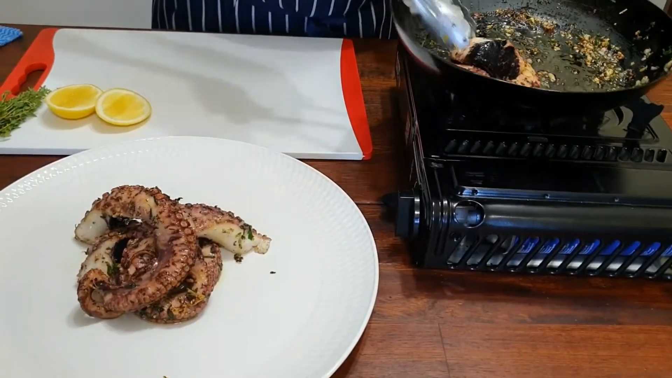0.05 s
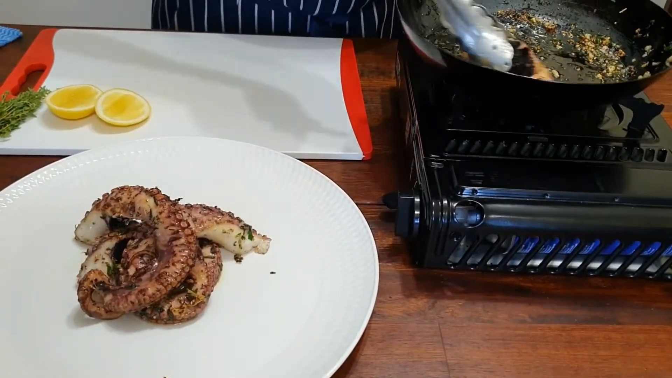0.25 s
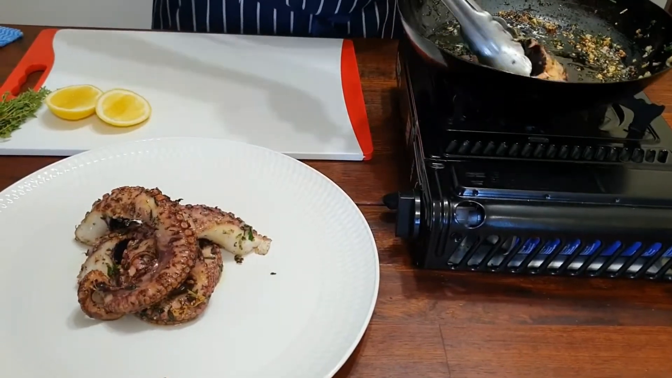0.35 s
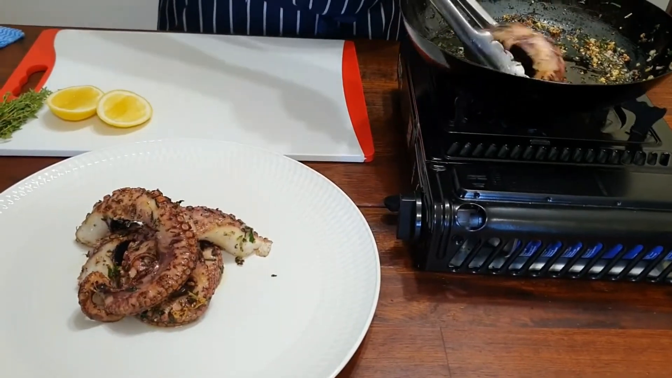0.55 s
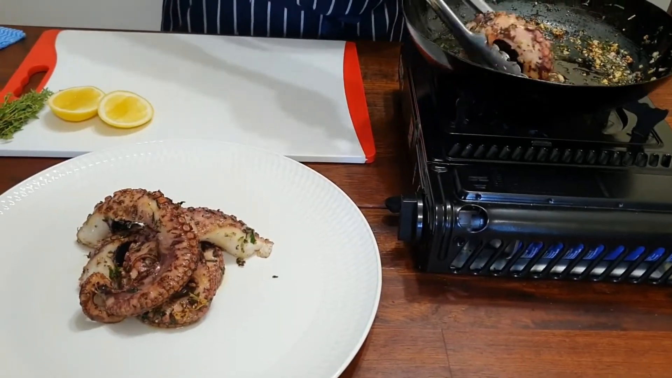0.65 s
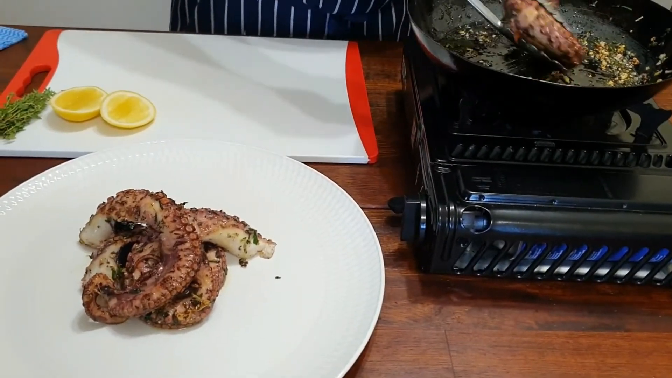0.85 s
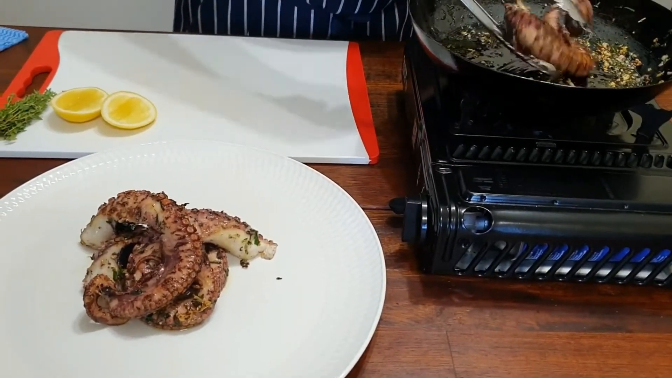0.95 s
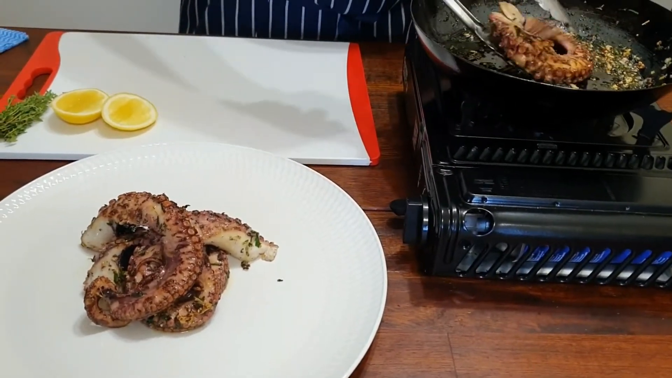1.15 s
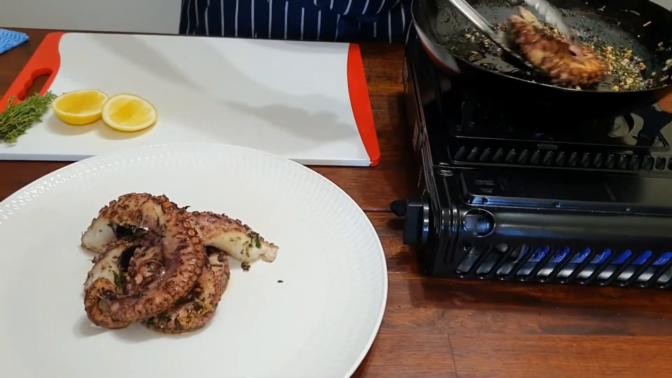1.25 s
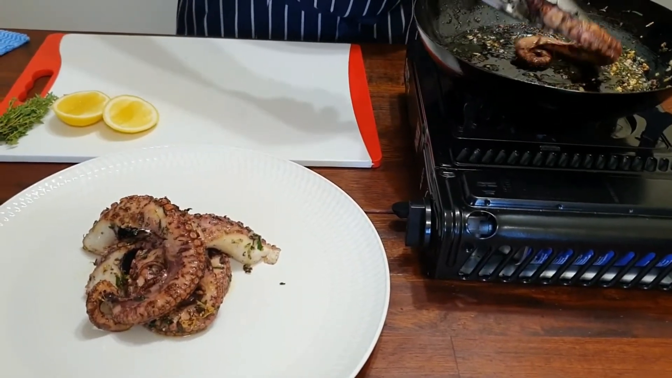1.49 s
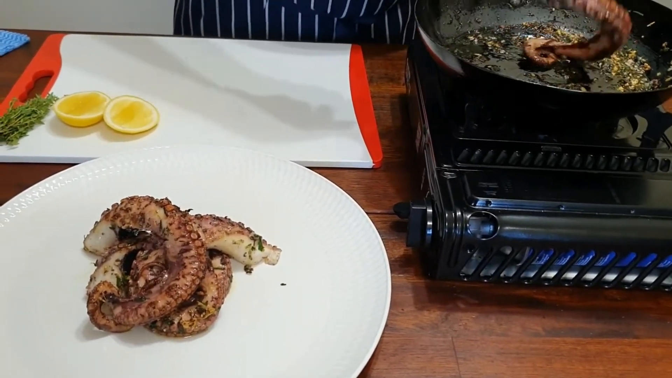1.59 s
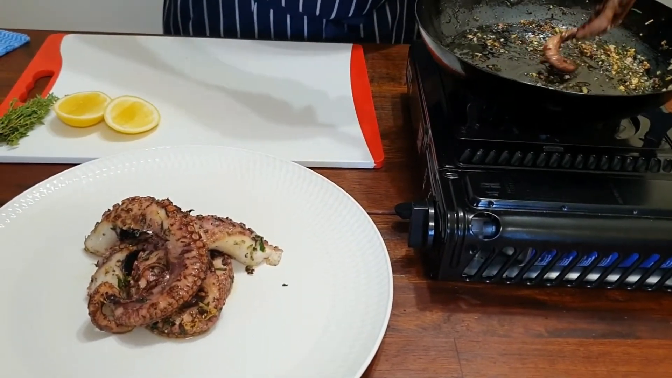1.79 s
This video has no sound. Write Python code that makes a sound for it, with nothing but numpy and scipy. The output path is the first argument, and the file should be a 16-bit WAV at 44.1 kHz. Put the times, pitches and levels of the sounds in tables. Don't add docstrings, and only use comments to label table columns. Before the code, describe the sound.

Metal tongs on a frying pan, heard close in stereo in a hard-walled kitchen. A light drag leads to a loud clank at 0.22 s, then the pan knocks its grate at 0.25 s, rebounding, briefly ringing and rocking. Scraping with small ticks runs to 0.6 s, a lighter clink lands at 0.61 s, rim taps at 1.07 s, and a faint scrape with nudges at 1.32-1.47 s, over low rumble and faint hiss.

```python
import sys
import numpy as np
from scipy import signal
from scipy.fft import rfft, irfft
from scipy.io import wavfile
from scipy.ndimage import uniform_filter1d

SR = 44100
rng = np.random.default_rng(int(sys.argv[2]) if len(sys.argv) > 2 else 0)


def pcm_store(signal):
    levels = np.round(np.clip(np.atleast_2d(signal), -1, 1) * 32767)
    wavfile.write(sys.argv[1], SR, levels.astype(np.int16).T)


def gain_from_decibels(decibels):
    exponent = np.asarray(decibels, float) / 20
    return 10 ** exponent


N = 79380

# frequency [Hz], level [dB].
RIM_CRACK = [(200, -20), (683, -3), (1710, -3), (2700, -16), (3300, -3), (4200, -15), (8000, -14),
             (10500, -50)]


def read(points, hz):
    f, value = np.transpose(points)
    return np.interp(np.log(hz + 1), np.log(f + 1), value)


def evened(x):
    return x / np.sqrt(np.mean(x ** 2) + 1e-20)


def tinted(x, colour):
    hz = np.fft.rfftfreq(len(x), 1 / SR)
    return irfft(rfft(x) * gain_from_decibels(read(colour, hz)), len(x))


def add(mix, s, sound):
    at = round(s * SR)
    sound = sound[max(-at, 0):]
    part = mix[max(at, 0):][:len(sound)]
    part += sound[:len(part)]


def pair(z, hz):
    # frequency [Hz], left-right likeness [0..1].
    likeness = [(60, 1), (250, 0.81), (500, 0.81), (1000, 0.012), (4000, 0.027)]
    same = np.clip(read(likeness, hz), 0, 1)[:, None]
    return np.array([z[0], same * z[0] + np.sqrt(1 - same ** 2) * z[1]])


def ring(hz, modes):
    rise_s, split_hz = .0015, 18
    t = np.arange(SR // 2) / SR
    db, t60_s = np.transpose(modes)[:, :, None]
    hz = np.array(hz)[:, None]
    twin_hz = hz + split_hz * rng.uniform(-1.7, 1, hz.shape)
    decay = gain_from_decibels(db - 60 * t / np.clip(t60_s, .01, .5))
    tones = np.sin(2 * np.pi * hz * t) + .5 * np.sin(2 * np.pi * twin_hz * t)
    return np.minimum(t / rise_s, 1) * (decay * tones).sum(0)


def blows(rows, body, colour):
    ring_send_db, crack_rise_s = -10, 0.00031
    rings, cracks, t = np.zeros(N), np.zeros(N), np.arange(8192) / SR
    for s, ring_db, crack_db, t60_s in rows:
        crack = evened(tinted(rng.standard_normal(8192), colour))
        envelope = np.minimum(t / crack_rise_s, 1) * gain_from_decibels(crack_db - 60 * t / max(t60_s, .004))
        add(rings, s, gain_from_decibels(ring_db) * body)
        add(cracks, s, crack * envelope)
    return np.array([rings + cracks, gain_from_decibels(ring_send_db) * rings + cracks])


def air(colour, db, patchy_db):
    frames, hz = N // 256 + 5, np.fft.rfftfreq(1024, 1 / SR)
    a, b, patches = rng.standard_normal((frames, 513, 2, 3)).T
    patches = uniform_filter1d(patches[0], size=10, axis=0)
    patches = evened(uniform_filter1d(patches, size=12, axis=1))
    z = pair(a + 1j * b, hz) * gain_from_decibels(read(colour, hz)[:, None] + patchy_db * patches)
    return gain_from_decibels(db) * evened(signal.istft(z, nperseg=1024, noverlap=768)[1][:, :N])


def rumble():
    # frequency [Hz], density [dB per Hz].
    rumble_colour = [(20, -61), (45, -19), (65, -3), (82, 2), (102, 10), (118, -33), (140, -51), (200, -37)]
    return air(rumble_colour, -60, patchy_db=-4.5)


def hiss():
    # frequency [Hz], density [dB per Hz].
    hiss_colour = [(30, -30), (80, -4), (170, -4.5), (380, -2), (1250, -6), (8200, -25.5), (9000, -40),
                   (14000, -34.5)]
    return air(hiss_colour, -59.5, patchy_db=1.0)


def kitchen(near, sent):
    room_db, early_db, early_t60_s = 4, 11, .035
    # frequency [Hz], t60 [s].
    room_t60 = [(100, 0.54), (300, 0.5), (1000, 0.41), (2500, 0.35), (6000, 0.42), (12000, 0.3)]
    # frequency [Hz], delay of the left port [s].
    left_lag = [(1000, .00022), (2500, .00009), (4000, .00005)]
    taps = np.zeros((2, SR))
    at = np.arange(200, SR - 20, 20) + rng.integers(0, 20, (2, (SR - 201) // 20))
    np.put_along_axis(taps, at, rng.choice([-1., 1.], at.shape), 1)
    hz, t, z = signal.stft(taps, SR, nperseg=256)
    fade = gain_from_decibels(-60 * t / read(room_t60, hz)[:, None]) + gain_from_decibels(early_db - 60 * t / early_t60_s)
    tail = signal.istft(pair(z, hz) * fade, SR, nperseg=256)[1]
    tail *= gain_from_decibels(room_db) / np.linalg.norm(tail[0])
    hz = np.fft.rfftfreq(N, 1 / SR)
    late = irfft(rfft(near) * np.exp(-2j * np.pi * hz * read(left_lag, hz)), N)
    return signal.fftconvolve(sent[None], tail, axes=1)[:, :N] + [late, near]


def rocks():
    skew = 0.57
    # start [s], length [s], level [dB], pitch [Hz].
    rock_rows = [
        (0.171, 0.059, -56, 399),
        (0.22, 0.14, -37, 384),
        (0.364, 0.091, -42, 385),
        (0.446, 0.052, -43.5, 391.6),
        (0.504, 0.044, -53, 379),
        (0.633, .11, -47.5, 384),
        (0.245, 0.14, -48, 91.5),
        (1.006, 0.13, -58, 383),
        (1.08, 0.11, -57, 394),
        (1.349, 0.11, -58.5, 391),
    ]
    out = np.zeros(N)
    for s, length_s, db, hz in rock_rows:
        t = np.arange(0, length_s, 1 / SR)
        swell = np.sin(np.pi * (t / length_s) ** skew)
        add(out, s, gain_from_decibels(db) * swell * np.sin(2 * np.pi * hz * t))
    return out


def drags():
    slips_per_s, slip_spread_db = 1100, 4.5
    # time [s], pressure [dB], grit [dB].
    drag_curves = [
        [(0.05, -56.5, -58), (0.162, -50.5, -56), (0.21, -51, -45.5), (0.215, -56, -27.5)],
        [(0.3, -37.5, -27.5), (0.396, -41, -40), (0.47, -41.5, -40.5), (0.53, -55.5, -49.5),
         (0.575, -38, -47.5), (0.606, -48, -47), (0.64, -59, -53.5), (0.712, -73.5, -49), (0.74, -86, -89.5)],
        [(1.32, -81, -81), (1.345, -85, -72), (1.36, -52.5, -52), (1.39, -54, -55), (1.47, -82, -85)],
    ]
    drag_hz = [650, 790, 1040, 1140, 1180, 1255, 1800, 2570]
    # level [dB], t60 [s].
    drag_modes = [(-9, .02), (-10, .02), (-2, .03), (0, .03), (-5, .02), (-3, .025), (-11, .012),
                  (-5, .025)]
    # frequency [Hz], level [dB].
    grit_colour = [(300, -16), (600, 16), (1800, 12), (2650, 6), (3550, 7), (3900, 0.5), (7500, -4),
                   (13000, -19)]
    t = np.arange(N) / SR
    sizes = gain_from_decibels(slip_spread_db * rng.exponential(1, N)) * rng.choice([-1., 1.], N)
    slips = evened(sizes * (rng.random(N) < slips_per_s / SR))
    press, grit = np.zeros(N), np.zeros(N)
    for curve in drag_curves:
        s, press_db, grit_db = np.transpose(curve)
        press += gain_from_decibels(np.interp(t, s, press_db, left=-200, right=-200))
        grit += gain_from_decibels(np.interp(t, s, grit_db, left=-200, right=-200))
    body = ring(drag_hz, drag_modes)
    grains = evened(tinted(rng.standard_normal(N) + 0.11 * slips, grit_colour))
    scrape = signal.oaconvolve(slips * press, body / np.linalg.norm(body))[:N]
    return scrape * gain_from_decibels(-4) + grains * grit * gain_from_decibels(-10.0)


def nudges():
    nudge_hz = [630, 790, 1160, 1257, 1310, 1800, 2210, 3280]
    # level [dB], t60 [s].
    nudge_modes = [(-9.5, 0.098), (3.5, 0.025), (-15, 0.06), (0.5, 0.036), (-4, 0.067), (-5, 0.056),
                   (-28, 0.017), (-15, .02)]
    # time [s], ring [dB], crack [dB], crack t60 [s].
    nudge_rows = [(1.325, -57.5, -62, 0.014), (1.333, -50, -70, .01), (1.350, -57, -50, 0.016),
                  (1.358, -46, -63, .02), (1.365, -53, -51, .02), (1.378, -48, -59, 0.027),
                  (1.386, -46, -69, 0.015), (1.398, -63, -71, 0.018), (1.413, -49.5, -57.5, 0.026),
                  (1.426, -62, -71, 0.019), (1.438, -59, -75, 0.015), (1.453, -57, -68, 0.015)]
    return blows(nudge_rows, ring(nudge_hz, nudge_modes), RIM_CRACK)


def rim():
    rim_hz = [290, 670, 745, 1136, 1300, 1688, 1760, 2046, 2300, 3050, 3170, 3277, 3560]
    # level [dB], t60 [s].
    rim_modes = [(-8, .08), (0, .09), (-6, .06), (-5, .07), (-4, .09), (4, .09), (-3, .05), (-8, .05),
                 (-8, .06), (-6, .04), (-4, .04), (1, .08), (-6, .05)]
    # time [s], ring [dB], crack [dB], crack t60 [s].
    tap_rows = [
        (1.072, -46, -42.5, 0.016),
        (1.077, -54.5, -40, 0.013),
        (1.089, -48, -49.5, 0.056),
        (1.12, -53.5, -66, 0.034),
    ]
    # time [s], ring [dB], crack [dB], crack t60 [s].
    tick_rows = [
        (.418, -99, -46.5, 0.036),
        (.445, -99, -52, 0.048),
        (.472, -99, -49.5, 0.019),
        (.567, -99, -53, 0.028),
        (.707, -99, -49.5, .03),
        (1.354, -99, -38, 0.014),
        (1.362, -99, -65, 0.042),
        (1.45, -99, -61.5, 0.026),
    ]
    # frequency [Hz], level [dB].
    tick_colour = [(1500, -5), (3500, -14), (5000, -13), (5800, 4), (8200, -1), (9200, -13.5), (12500, -8),
                   (14000, -37.5)]
    body = ring(rim_hz, rim_modes)
    return blows(tap_rows, body, RIM_CRACK) + blows(tick_rows, body, tick_colour)


def clink():
    clink_hz = [1135, 1222, 1830, 1990, 2570, 2800, 5539, 7585]
    # level [dB], t60 [s].
    clink_modes = [(0, .1), (-2, .08), (-9, .06), (-4, .04), (-2, .08), (-4, .1), (-5, .06), (-16, .05)]
    # time [s], ring [dB], crack [dB], crack t60 [s].
    clink_rows = [
        (.613, -40, -33.5, 0.034),
        (.619, -50, -48, 0.017),
        (.628, -48, -43, 0.079),
        (.637, -66, -60, 0.026),
        (.706, -66, -64, 0.06),
    ]
    # frequency [Hz], level [dB].
    clink_colour = [(600, -28), (1180, 5), (1500, -17.5), (2000, -3), (2800, -12), (3300, -27), (6200, -15),
                    (15000, -33.5)]
    return blows(clink_rows, ring(clink_hz, clink_modes), clink_colour)


def knocks():
    send_db = -9.5
    knock_hz = [850, 960, 1060, 1750, 2500]
    # level [dB], t60 [s].
    knock_modes = [(-15, 0.0094), (5.5, 0.015), (-1.5, 0.019), (-12, 0.052), (-7.5, 0.029)]
    # time [s], level [dB].
    knock_rows = [
        (0.2524, -55),
        (0.2551, -14.5),
        (0.2602, -24),
    ]
    out, body = np.zeros(N), ring(knock_hz, knock_modes)
    for s, db in knock_rows:
        add(out, s, gain_from_decibels(db) * body)
    return np.array([out, gain_from_decibels(send_db) * out])


def pan():
    pan_hz = [538, 821, 935, 1012, 1168, 1224, 1275, 1330, 1402, 1531, 1765, 2286, 2485, 2831]
    # level [dB], t60 [s].
    pan_modes = [(-10, 4.7), (-2, -0.62), (-20, -6), (-2, 3.3), (-2, -1.9), (-16, 1), (13.5, -0.1559),
                 (-16, -2), (-9, -1.9), (7, -0.8), (-11, -1.5), (-11, 5), (-3, 0.1), (-1, 0.03)]
    # time [s], ring [dB], crack [dB], crack t60 [s].
    pan_rows = [
        (-.02, -76, -25, 0.085),
        (.008, -51.5, -67, 0.11),
        (.2527, -51, -9, 0.011),
        (.2555, -36, -12, 0.0083),
        (.2605, -32, -25.5, 0.0094),
        (.268, -37.5, -19, 0.021),
        (.276, -33.5, -22, 0.01),
        (.293, -48.5, -32.5, 0.055),
        (.316, -32, -32, 0.037),
    ]
    # frequency [Hz], level [dB].
    pan_colour = [(60, -2.5), (389, -4.5), (660, -12.5), (1000, 0.5), (1400, -2.5), (2600, -10.5),
                  (11600, -50.5), (15000, -86)]
    return blows(pan_rows, ring(pan_hz, pan_modes), pan_colour)


def tongs():
    caught_after_s, grip_db, grip_s = .04, -18, .002
    tongs_hz = [1487, 1822, 2081, 2451, 2927, 3323, 3800, 5537, 5826]
    # level [dB], t60 [s].
    tongs_modes = [(-8, 1.4), (-12.5, 1), (-16, -2.2), (0, 1.3), (-7, -3), (-20, 6), (-8, .08), (-4.5, 1.2),
                   (-13, -9)]
    # time [s], ring [dB], crack [dB], crack t60 [s].
    tongs_rows = [
        (.2175, -31.5, -22, 0.035),
        (.2215, -45, -21, 0.033),
        (.2295, -57, -29.5, 0.033),
        (.239, -48, -34.5, 0.12),
    ]
    # frequency [Hz], level [dB].
    tongs_colour = [(200, 1), (356, -1.5), (700, -5.5), (1400, 11), (2500, -1.5), (4200, -2.5),
                    (13800, -12.5), (15000, -47.5)]
    since_s = np.arange(N) / SR - tongs_rows[0][0] - caught_after_s
    grip = gain_from_decibels(grip_db / (1 + np.exp(-since_s / grip_s)))
    return grip * blows(tongs_rows, ring(tongs_hz, tongs_modes), tongs_colour)


def scene():
    metal = tongs() + pan() + clink() + rim() + nudges() + drags() + knocks()
    thin = signal.butter(3, 260, "high", fs=SR, output="sos")
    in_room = kitchen(*signal.sosfilt(thin, metal))
    rocking = rocks() * gain_from_decibels(np.array([[3.5], [2.5]]))
    return in_room + rocking + hiss() + rumble()


def band_limit(x):
    return signal.sosfilt(signal.butter(12, 15110, fs=SR, output="sos"), x)


def record(dry):
    edge = signal.butter(6, 14200, fs=SR, output="sos")
    return band_limit(signal.sosfilt(edge, dry))


dry = scene()
out = record(dry)
pcm_store(out)
```